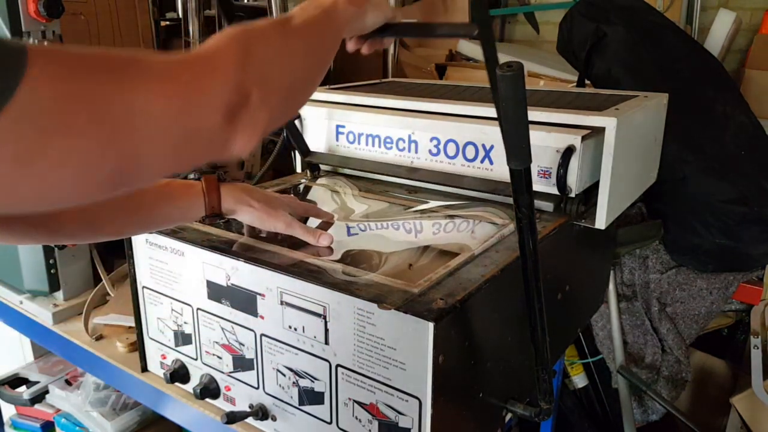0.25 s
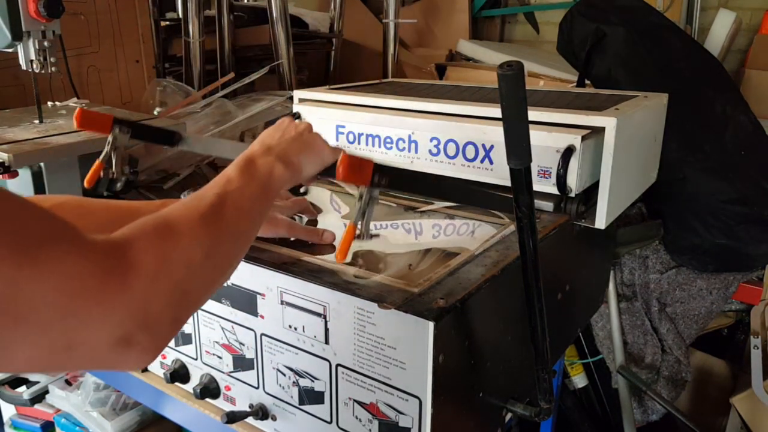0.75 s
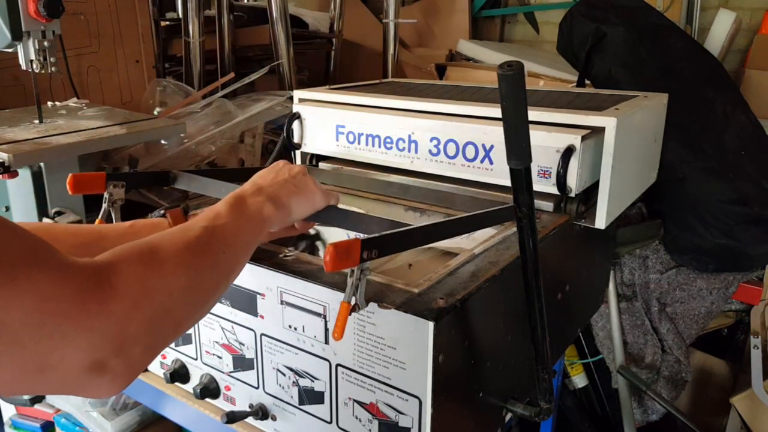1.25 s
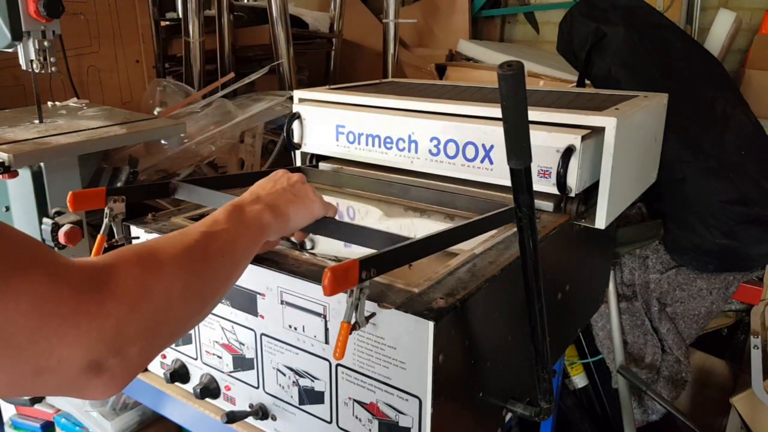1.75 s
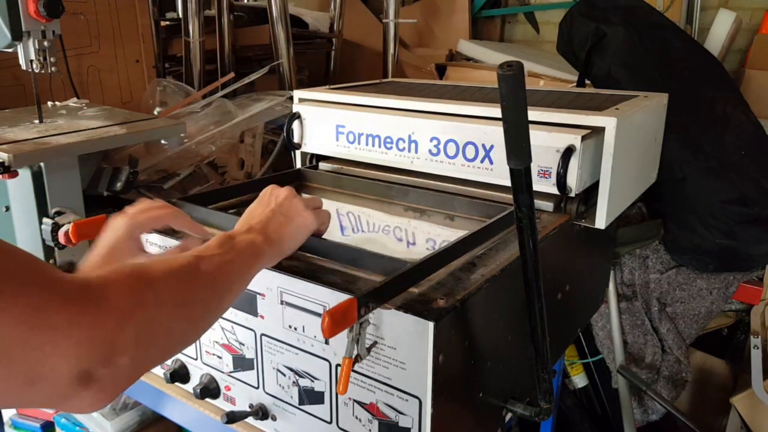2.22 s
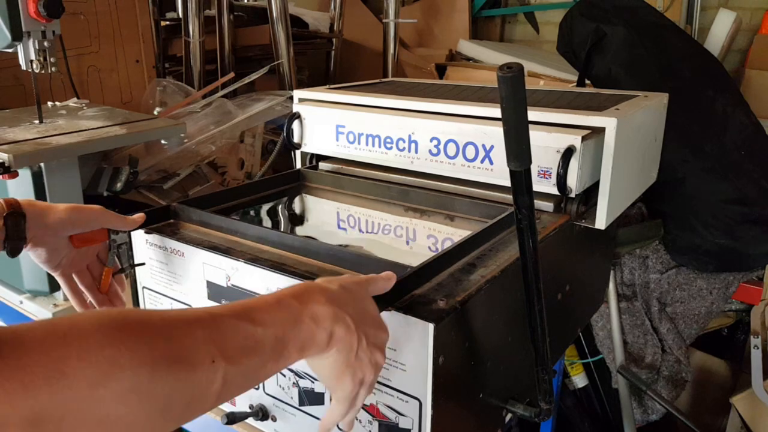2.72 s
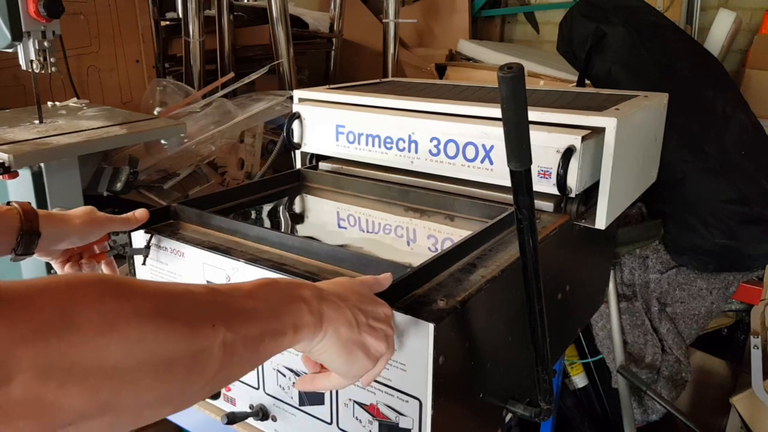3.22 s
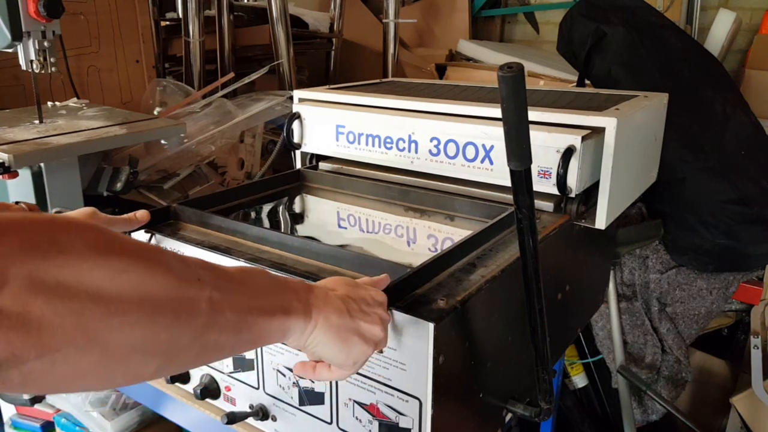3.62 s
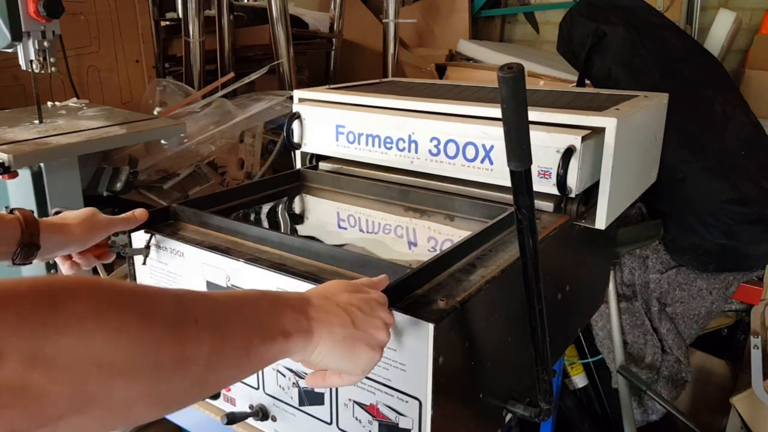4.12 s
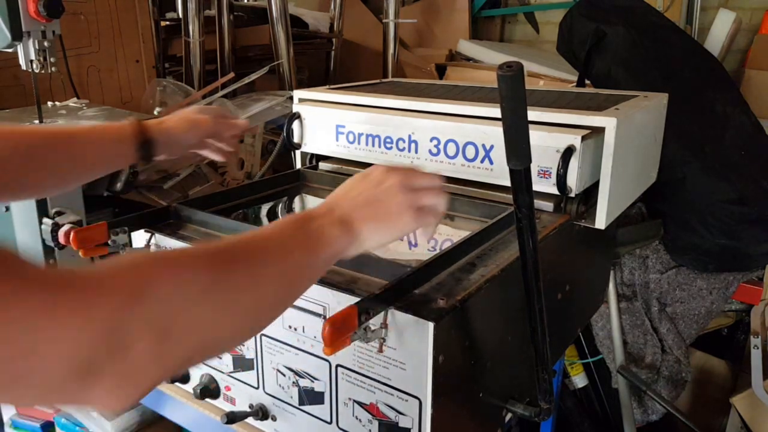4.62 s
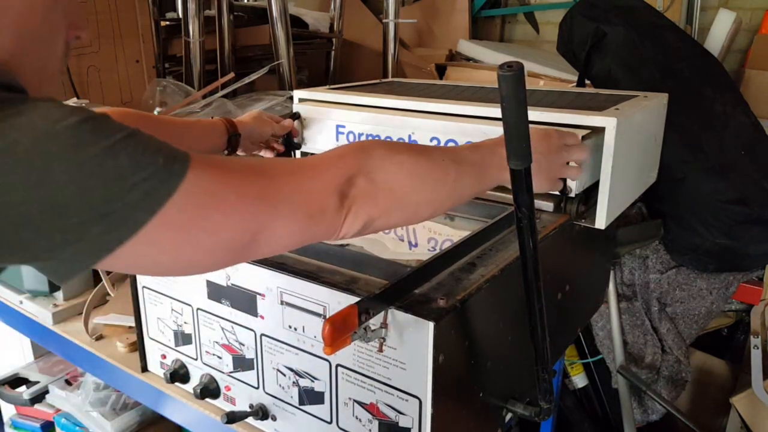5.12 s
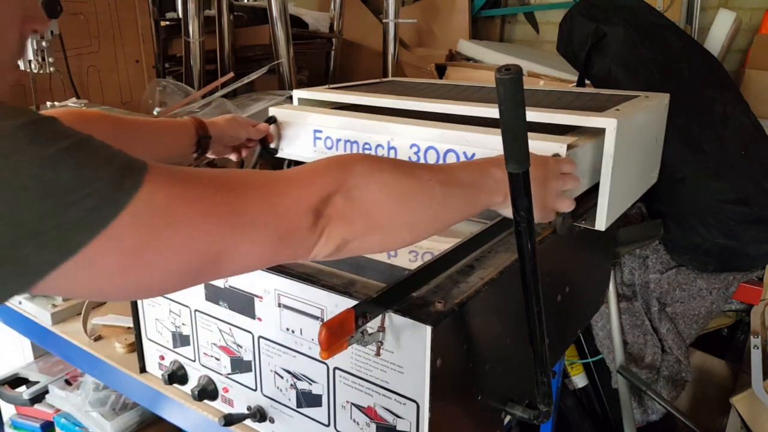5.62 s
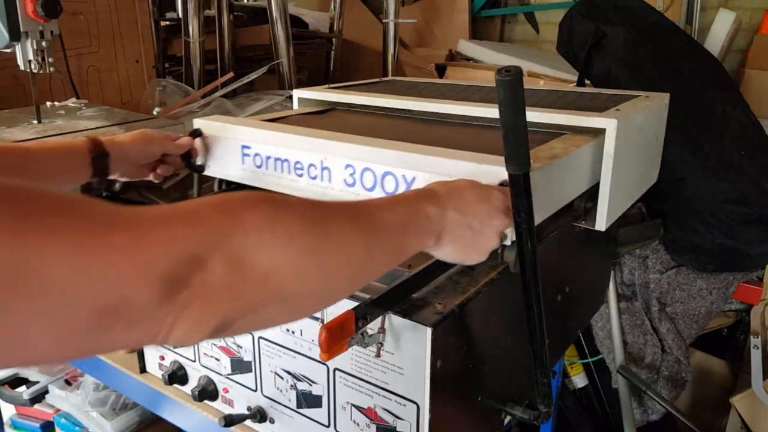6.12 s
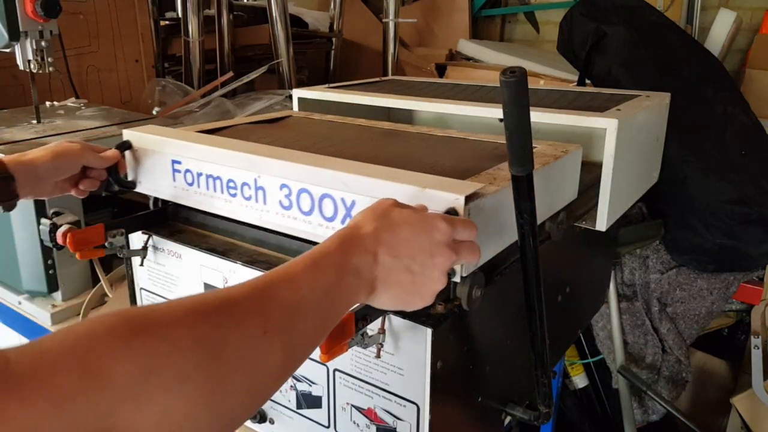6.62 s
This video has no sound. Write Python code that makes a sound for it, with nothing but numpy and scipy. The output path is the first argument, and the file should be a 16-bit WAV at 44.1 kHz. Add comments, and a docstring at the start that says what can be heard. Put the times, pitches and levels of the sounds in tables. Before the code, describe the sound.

A close stereo perspective in a small, fairly dry workshop, with a faint low hum near 80 Hz, slight rumble and thin hiss, stronger on the left. A steel frame shudders in the hands; a hollow knock comes at 0.3 s, then a hard, clattering landing on the cabinet at 0.7-0.8 s. Softer thumps, faint thin squeaks and short scrapes follow, with a firm thud at 1.5 and a bright catch clack at 1.66. Light lever clicks begin at 2.7; sharp clamp snaps ring at 3.1 and 3.3. Dull hollow thuds cluster at 3.6-3.8 as the clamps are pressed home. From 4.2 it is nearly quiet, with a soft cloth rustle. At 5.25 a sheet-metal heater jerks, scrapes at 5.47, then rolls forward with rumble, gritty rattle and hiss. Clanking bumps peak at 6.0-6.5, with brief squeaks and a scrape at 6.3, before the roll eases to the end around 6.9.

```python
"""Clamping a vacuum forming machine

A steel clamping frame is swung down in a small workshop and knocks on the hollow cabinet; toggle clamps
snap over and are pressed home, then the heater rolls forward on rails, bumping, over a low hum.
Blows are struck modal resonators: coloured decaying noise plus clear modes, tilted by hardness.
Sliding parts are the same resonators excited by random slips; squeaks are single gliding tones.
Hum is a sine with a narrow-band waver, and the background is shaped stereo noise."""
import sys
import numpy as np
from scipy import signal
from scipy.fft import rfft, irfft, next_fast_len
from scipy.io import wavfile
from scipy.ndimage import uniform_filter1d

SR = 44100
rng = np.random.default_rng(int(sys.argv[2]) if len(sys.argv) > 2 else 0)


def generate_wav(sig):
    """Save sig (samples, or channels by samples) to the path in sys.argv[1] as 16-bit PCM at SR."""
    pcm = np.round(np.clip(np.atleast_2d(sig).T, -1, 1) * 32767).astype(np.int16)
    wavfile.write(sys.argv[1], SR, pcm)


N = 302515
RING_SIZE = 49152  # samples in one resonator response


def amp(db):
    """Decibel definition: converts a level to a linear gain."""
    return 10 ** (np.asarray(db) / 20)


def rms(x):
    """Mean energy: the root mean square of a signal."""
    return np.sqrt(np.mean(x ** 2) + 1e-20)


def read(points, hz, axis=1):
    """Logarithmic frequency scale: one table column is interpolated along it."""
    table = np.array(points, float)
    return np.interp(np.log(hz + 1), np.log(table[:, 0] + 1), table[:, axis])


def band(x, lo_hz, hi_hz, order=3):
    """Band limiting: a Butterworth band-pass filter."""
    sections = signal.butter(order, [lo_hz, min(hi_hz, SR / 2 - 1)], "band", fs=SR, output="sos")
    return signal.sosfilt(sections, x)


def colour(x, points):
    """Minimum phase: the filter through (hz, gain_db) points is causal, so attacks stay sharp."""
    size = next_fast_len(x.shape[-1])
    log_gain = np.log(amp(read(points, abs(np.fft.fftfreq(size, 1 / SR)))))
    gain = np.exp(np.conj(signal.hilbert(log_gain)))[:size // 2 + 1]
    return irfft(rfft(x, size) * gain, size)[..., :x.shape[-1]]


def add(mix, s, sound):
    """Superposition: a sound is summed into the mix from time s."""
    part = mix[:, max(round(s * SR), 0):][:, :sound.shape[1]]
    part += sound[:, :part.shape[1]]


def diffuse(size, spread):
    """Diffuse field: noise at two microphones, with side minus mid in dB set against frequency."""
    mid, side = rfft(rng.standard_normal((2, size)))
    width = amp(read(spread, np.fft.rfftfreq(size, 1 / SR)))
    left_right = np.array([mid + width * side, mid - width * side])
    return irfft(left_right / np.sqrt(1 + width ** 2), size)


def rattle(chatter_s, rattle_hz=600, first=1.4, count=12):
    """Contact bounce: one firm contact, then a quick run of lighter ones."""
    contacts, order = np.zeros(RING_SIZE), np.arange(count)
    at = (order + rng.random(count)) / count * 2 * np.clip(chatter_s, 0, .1)
    impulses = rng.choice([-1, 1], count) * np.exp(-2 * order / count)
    np.add.at(contacts, (at * SR).astype(int), impulses)
    contacts = band(contacts, rattle_hz, SR / 2, order=2)  # light rebounds carry little bass
    contacts[0] += first
    return contacts / np.linalg.norm(contacts)


# decay of the workshop before each part's decay factor: frequency_hz [Hz], t60_s [s]
ROOM_DECAY = [(100, 1), (200, 0.63), (450, 0.77), (1000, 0.54), (2800, 0.41), (7000, 0.26), (15000, 0.24)]
# stereo width of the dense modes: frequency_hz [Hz], side_minus_mid_db [dB]
STEREO_WIDTH = [(40, -13), (130, -19), (220, -16), (380, -10), (700, -6.5), (1300, -4), (2500, -1.5),
                (15000, -1)]


def response(spectrum, modes, decay=1, ring_db=0, crack_db=5, crack_s=0.0048, chatter_s=0, tick=0,
             split=0.0043, twin=0.3):
    """Modal decay: a struck part gives an early crack, decaying dense modes and a few clear ones."""
    t = np.arange(RING_SIZE) / SR
    hz, age, z = signal.stft(diffuse(RING_SIZE, STEREO_WIDTH), SR, nperseg=256)
    fading = z * np.exp(-np.log(1000) * age / (decay * read(ROOM_DECAY, hz)[:, None]))
    dense = signal.istft(fading, SR, nperseg=256)[1]
    out = dense[:, :RING_SIZE] * (1 + amp(crack_db) * np.exp(-t / crack_s))
    out[:, 0] += tick
    if chatter_s > 0:
        out = signal.fftconvolve(out, rattle(chatter_s)[None], axes=1)[:, :RING_SIZE]
    for mode_hz, db, t60 in modes:
        # higher modes reach the two microphones further out of step
        offset = rng.uniform(-1.14, 1, (2, 1)) * min(mode_hz / 6000, .5)
        phase = 2 * np.pi * (mode_hz * t + rng.random() + offset)
        # each mode has a weaker twin close by, and the two beat
        pair = np.sin(phase) + twin * np.cos(phase * (1 + split * rng.uniform(-0.53, 1)))
        out += amp(db + ring_db) * np.exp(-np.log(1000) * t / (t60 * decay)) * pair
    return colour(out, spectrum)


# the four registers thump, body, clang and edge: low_hz [Hz], high_hz [Hz]
REGISTERS = [(100, 280), (280, 700), (700, 3500), (3500, 16000)]


def contact(shape_db, strength_db, hardness, pivot_hz):
    """Contact stiffness: harder contact tilts the register levels towards the treble."""
    octaves = np.log2(np.sqrt(np.prod(REGISTERS, axis=1)) / pivot_hz)
    return strength_db + np.array(shape_db) + hardness * octaves


def blow(ring, levels_db):
    """Impact spectrum: the filter steers each register of the attack towards its level."""
    attack = ring[:, :SR // 25]  # the first 40 ms
    points = []
    for (lo, hi), db in zip(REGISTERS, levels_db):
        measured_db = 20 * np.log10(rms(band(attack, lo, hi)))
        points.append((np.sqrt(lo * hi), db - measured_db))
    return colour(ring, points)


def friction(ring, curve, registers, per_s, spread_db):
    """Stick-slip excitation: uneven tiny slips keep a part ringing; each register follows its level."""
    sizes = amp(spread_db * np.minimum(rng.exponential(1, N), 4))
    slips = sizes * rng.choice([-1, 1], N) * (rng.random(N) < per_s / SR)
    sound = signal.oaconvolve(slips[None], ring, axes=1)[:, :N]
    s, *levels = np.transpose(curve)
    out = np.zeros((2, N))
    for (lo, hi), db in zip(registers, levels):
        part = band(sound, lo, hi)
        out += part / rms(part) * amp(np.interp(np.arange(N) / SR, s, db, left=-120, right=-120))
    return out


def driven(effort, law):
    """Power law: each register's level in dB is a straight line in the shared effort in dB."""
    return [(s, *(db + slope * effort_db for db, slope in law)) for s, effort_db in effort]


def strokes(rows, rise_s, fall_db_per_s):
    """Stroke envelope: each stroke rises, holds until its length is over and falls exponentially."""
    t = np.arange(0, N, 128)[:, None] / SR
    gain = 0
    for s, length_s, *db in rows:
        fall_db = fall_db_per_s * np.maximum(t - s - length_s, 0)
        gain = gain + np.clip((t - s) / rise_s, 0, 1) * amp(np.array(db) - fall_db)
    return np.hstack([t, 20 * np.log10(gain + 1e-9)])


# steady background: frequency_hz [Hz], relative_db [dB per Hz], left_minus_right_db [dB],
# side_minus_mid_db [dB]
BACKGROUND = [(20.2, -26.5, -5, -12.5), (43.5, 2.5, -7.5, -16), (58.7, 5, 5.5, -2.5), (140, -10.5, -2, -19),
              (305, -15.5, 5.5, -9), (598, -21.5, 2.5, -2.5), (1300, -28.5, 2, 3), (1690, -27.5, 10, 0.5),
              (2050, -17.5, 12.5, 2), (3300, -34.5, 9, 0), (4050, -21.5, 11, 1.5), (8600, -41.5, 4, -4),
              (10800, -26, 2.5, -19.5), (15630, -26, 0.5, -32)]


def air(level_db=-62):
    """Stationary noise: faint room rumble and a thin hiss, the hiss stronger on the left."""
    hz = np.fft.rfftfreq(N, 1 / SR)
    sides = amp(np.outer([.5, -.5], read(BACKGROUND, hz, axis=2)))
    balance = sides / np.linalg.norm(sides, axis=0)
    white = diffuse(N, [(row[0], row[-1]) for row in BACKGROUND])
    noise = irfft(rfft(white) * amp(read(BACKGROUND, hz)) * balance, N)
    return amp(level_db) * noise / rms(noise)


# loudness of the hum: start_s [s], level_db [dB]
HUM_LEVELS = [(0, -65.5), (2, -59), (4.3, -61.5), (4.75, -68), (4.9, -62.5), (6.86, -78.5)]


def hum(hum_hz=81.2):
    """Narrow-band modulation: a low sine wavers as a little noise close to its pitch is added."""
    t = np.arange(N) / SR
    drift = band(rng.standard_normal(N), hum_hz - 5, hum_hz + 5, order=2)
    tone = np.sqrt(2) * np.sin(2 * np.pi * hum_hz * t) + .2 * drift / rms(drift)
    return amp(np.interp(t, *np.transpose(HUM_LEVELS))) * tone


# how hard the hands work the frame as they lower, seat, clamp and let go: start_s [s], effort_db [dB]
HANDLING_EFFORT = [(0, -3), (.14, -14), (.3, -6.5), (.68, -2), (.87, -6), (1.08, -9), (1.6, -3.5),
                   (1.85, 1.5), (2.05, -5), (2.3, -7), (2.45, -6.5), (2.65, -4), (2.85, -3), (3.5, 1),
                   (3.92, 2.5), (4.2, -12.5), (4.48, -14), (4.7, -32.5)]
# shudder, scrape and hiss of the frame: level_at_zero_effort_db [dB], slope [dB per dB of effort]
HANDLING_LEVELS = [(-46.5, 1), (-60.5, 2), (-71, 1.6)]
# colour of the frame's response: frequency_hz [Hz], relative_db [dB per Hz]
FRAME_COLOUR = [(40, -40), (80, -25), (110, -25), (142, -7), (165, -10), (215, 0), (310, -11), (400, -7),
                (480, -8), (550, -3), (720, -13), (930, -16), (1250, -12), (1700, -19), (2700, -16),
                (4000, -26), (7000, -31), (11500, -37), (16000, -50)]
# clear modes of the frame, before ring and decay settings: pitch_hz [Hz], relative_db [dB], t60_s [s]
FRAME_TONES = [(123.1, -14, 0.8), (143.5, -17, 0.56), (187.9, -16.5, 0.29), (209.1, -18.5, 0.37),
               (232.7, -26, 0.5), (276.5, -31, 0.91), (322.3, -26.5, 1), (382.4, -17.5, 0.39),
               (454, -28, 1), (491, -32.5, 0.62), (554.6, -28.5, 0.48), (605, -31, 0.6), (839, -18, 0.63),
               (1004, -19.5, 0.19), (1175, -30.5, 0.5), (1267, -20.5, .36), (1330, -35, 0.35),
               (1960, -22.5, 0.42), (2700, -31, 0.36), (3040, -17.5, 0.5), (3438, -22.5, .3),
               (4230, -17.5, .28)]


def shudder():
    """Forced vibration: the frame shudders, scrapes and hisses in the hands that work it."""
    ring = response(FRAME_COLOUR, FRAME_TONES, decay=0.27, ring_db=-1.0)
    levels = driven(HANDLING_EFFORT, HANDLING_LEVELS)
    return friction(ring, levels, [(50, 266), (330, 1500), (4000, 9200)], per_s=690, spread_db=2.0)


# the frame knocks on the cabinet: start_s [s], relative_strength_db [dB], hardness [dB per octave],
# decay [factor on t60], panel_hz [Hz] of the panel that is hit
FRAME_KNOCKS = [(0.296, -31.5, -10, 1.3, 198.7), (0.299, -38, -4.5, 1.7, 510),
                (0.367, -46.5, -4, 0.89, 477), (0.46, -60, -8.5, 1, 520), (0.71, -29, 0, 1.45, 186),
                (0.717, -26, -1.5, 1.27, 545), (0.729, -31.5, 1, 1.07, 425),
                (0.741, -28.5, 0.33, 1.23, 1267), (0.781, -27.5, -8, 1.25, 221.6),
                (0.799, -33, 1.14, 0.94, 2610), (0.809, -34, -1, 1.3, 539), (1.021, -42.5, -5, 0.98, 205.6),
                (1.059, -49, -5, 0.9, 555), (1.183, -40, -5, 0.67, 199), (1.203, -34.5, -9, 0.79, 145),
                (1.377, -40, -7.5, 0.97, 198.2), (1.486, -29, -10.5, 0.52, 145.5),
                (1.665, -32, -3, 1.17, 288.7), (2.114, -48, -5.5, 2.1, 129), (2.373, -44, -10, 1.7, 228.3),
                (2.742, -41, -2, 0.43, 309), (2.802, -40, -15, 0.48, 308), (2.956, -52, -4, 0.67, 554),
                (3.308, -32.5, -2, 0.85, 364)]
# a knock at hardness 0: relative levels [dB] of thump, body, clang and edge
KNOCK_REGISTERS = [1.95, 1.5, -1, -7.5]
PANEL_T60_S = 0.46  # before the decay factor


def knocks(panel_db=-11, lowest_hz=181, thinning=0.19):
    """Impact on a hollow body: frame and panel modes ring; softer knocks shake the cabinet lower down."""
    out = np.zeros((2, N))
    for s, db, hardness, decay, panel_hz in FRAME_KNOCKS:
        modes = FRAME_TONES + [(panel_hz, panel_db, PANEL_T60_S)]
        ring = response(FRAME_COLOUR, modes, decay, crack_db=3.0, crack_s=0.12, chatter_s=.0055)
        knock = blow(ring, contact(KNOCK_REGISTERS, db, hardness, pivot_hz=173))
        floor_hz = lowest_hz * 2 ** (thinning * hardness)  # thinning in octaves per unit of hardness
        add(out, s, amp(-3) * band(knock, floor_hz, SR / 2))
    return out


# the clamps snap: start_s [s], part [name], strength_db [dB], hardness [dB per octave],
# decay [factor on t60], ring_db [dB] of the clear modes
CLAMP_SNAPS = [(0.709, "catch", -38.5, -3, .8, -6), (0.744, "lever", -43.5, -6, 1.2, -11.5),
               (0.801, "left", -42, -2.5, 1.2, -4.5), (0.822, "catch", -48.5, -1.5, 1.1, -3),
               (1.656, "catch", -36.5, 4.5, 1.01, 11.5), (1.908, "catch", -61, -3, 2.7, -16),
               (2.112, "lever", -65, 4.5, 1.5, 1), (2.718, "lever", -42, 2, 0.89, 14.5),
               (2.742, "lever", -42.5, -4.5, 0.83, -5.5), (2.838, "lever", -52, -4, 1.1, -9),
               (2.906, "lever", -52.5, -6, 0.39, 4), (2.928, "lever", -53, -6, 2, 0),
               (2.984, "lever", -47, 1.2, 0.68, 9), (3.024, "lever", -56.5, 1, 0.52, -2),
               (3.063, "lever", -55, 1, 0.82, -3), (3.084, "lever", -56.5, 3, 1, -15),
               (3.106, "right", -28, 1.6, 0.89, 0.5), (3.302, "left", -31, -0.4, 0.9, 5.5),
               (3.679, "left", -71.5, 5.5, 1.6, -8), (3.741, "left", -51, -1.5, 1.4, 0),
               (3.812, "left", -51.5, -2.5, 0.74, -4), (4.985, "right", -74, 7.5, 0.92, -4.5),
               (5.29, "right", -66, -5, 0.95, -8), (5.361, "right", -58.5, 2.5, 1.05, -9)]
# the frame's catch, the loose lever and the right and left clamps, by name:
# colour as frequency_hz [Hz], relative_db [dB per Hz];
# modes, before ring and decay settings, as pitch_hz [Hz], relative_db [dB], t60_s [s]
CLAMP_PARTS = { "catch": ([(50, -8), (200, -2), (700, -5), (1300, 2.5), (2500, -2.5), (4000, 7),
               (5000, 2.5), (6600, 8.5), (9000, 0), (11500, -1), (12800, -9.5), (16000, -16)],
               [(1263, -27, 0.68), (2630, -26, 0.58), (3240, -30.5, 0.31), (3977, -34.5, 0.25),
               (5400, -25.5, 0.26), (5600, -26, 0.19), (6370, -27.5, 0.15), (6990, -29, 0.15),
               (9800, -21.5, .18)]), "lever": ([(50, -19.5), (200, 13.5), (550, -13.5), (800, -7.5),
               (1250, 3.5), (2100, 3.5), (2500, -5.5), (4000, 2), (5400, -3), (6400, 5.5), (7600, -3),
               (9400, -1), (12000, -0.5), (16000, -13.5)], [(1020, -21, 0.28), (1185, -28, .35),
               (1250, -32.5, 0.3), (1837, -20.5, .35), (1970, -23, .3), (2163, -17.5, 0.62),
               (3840, -27, 0.32), (6470, -26, 0.2), (9300, -18, .1)]), "right": ([(100, -17), (220, -10),
               (290, -9.5), (560, -6), (800, -3), (1400, 1), (2000, 3.5), (2900, 7), (3700, -8), (5000, 1),
               (6300, 2), (8000, -2.5), (11500, 0.5), (16000, -11)], [(538, -18.5, 0.3),
               (1123, -18.5, 0.65), (1670, -14.5, 0.36), (1990, -24, 0.26), (2635, -11.5, 0.42),
               (2860, -30, 0.57), (5100, -25.5, .25), (5927, -25, .25), (6060, -17, 0.22),
               (6914, -21.5, .18), (9109, -20, .17), (11249, -15, 0.18)]), "left": ([(50, -18), (200, 13),
               (400, 15), (800, -11.5), (1050, 4), (1450, -2.5), (2100, 5), (2900, 7), (3700, 6),
               (4500, -2), (6200, 3), (8000, -3.5), (11500, 3), (16000, -15.5)], [(329.5, -10, 0.29),
               (417, -14, 0.36), (1047, -21.5, 0.45), (1955, -16.5, 0.3), (2140, -17.5, 0.25),
               (2732, -21, .4), (2844, -21.5, 0.57), (3661, -29, 0.39), (5922, -27, .3)])}
# a snap at hardness 0: relative levels [dB] of thump, body, clang and edge
SNAP_REGISTERS = [-19.5, -6, -1.5, -1]


def clamps(tick_db=13):
    """Impulse excitation: one sharp tick sets each steel lever or catch ringing in its own modes."""
    out = np.zeros((2, N))
    for s, part, db, hardness, decay, ring_db in CLAMP_SNAPS:
        ring = response(*CLAMP_PARTS[part], decay, ring_db=ring_db, crack_db=-14, crack_s=0.005,
                        tick=amp(tick_db))
        add(out, s, blow(ring, contact(SNAP_REGISTERS, db, hardness, pivot_hz=1630)))
    return out


# dry metal slides and sings: start_s [s], length_s [s], pitch_hz [Hz], glide [Hz per s],
# level_db [dB], tremble_hz [Hz rms]
METAL_SQUEAKS = [(.87, 0.59, 1182, 2, -63.5, 7.3), (1.36, 0.73, 1185, 2, -71, 11),
                 (2.1, 0.11, 3430, 0, -65.5, 31), (5.216, 0.16, 330.6, -3, -52.5, 10.5),
                 (5.597, 0.074, 1160, -700, -47.5, 32), (6.278, 0.059, 470, -700, -41, 10),
                 (6.493, 0.18, 593, 13, -49.5, 4.7), (6.707, 0.084, 1012, 1100, -52, 21)]


def squeaks(room_db=-9, decay=0.94):
    """Stick-slip oscillation: one mode swells and fades, gliding and trembling, drawn out by the room."""
    out = np.zeros((2, N))
    room = response([(100, 0.0048), (10000, 0)], [], decay)
    room = room / np.linalg.norm(room[0])
    for s, length_s, hz, glide, db, width_hz in METAL_SQUEAKS:
        size = int(length_s * SR)
        tremble = uniform_filter1d(rng.standard_normal(SR), 400)[:size]
        pitch = hz + glide * np.arange(size) / SR + width_hz * tremble / rms(tremble)
        tone = np.sin(2 * np.pi * np.cumsum(pitch) / SR) * np.hanning(size)
        sound = amp(room_db) * signal.fftconvolve(tone[None], room, axes=1)
        sound[:, :size] += tone
        add(out, s, amp(db) * sound / rms(sound[:, :size]))
    return out


# steel drags on steel as the frame settles and the levers are worked:
# start_s [s], length_s [s], scrape_db [dB], hiss_db [dB]
STEEL_DRAGS = [(1.18, 0.042, -59, -72), (1.49, 0.034, -59, -66), (1.62, 0.032, -51, -64),
               (1.7, 0.091, -66, -78), (2.75, 0.092, -54.5, -61.5), (2.91, 0.15, -46, -66),
               (3.16, 0.042, -67, -60), (3.57, 0.018, -57, -56.5), (3.67, 0.078, -50, -63),
               (3.74, .03, -54, -56), (3.8, 0.077, -54.5, -72), (4.14, 0.037, -61, -66.5)]


def drags():
    """Sliding friction: short strokes of steel on steel excite the frame as scrape and hiss."""
    ring = response(FRAME_COLOUR, FRAME_TONES, decay=0.27, ring_db=-1.0)
    levels = strokes(STEEL_DRAGS, rise_s=0.014, fall_db_per_s=152)
    return friction(ring, levels, [(520, 1700), (3100, 18000)], per_s=220, spread_db=2.5)


# the clamps are pressed home: start_s [s], strength_db [dB], body_above_thump_db [dB],
# panel_hz [Hz] of the panel that answers
CLAMP_PRESSES = [(3.588, -35, -3, 360.2), (3.607, -37, -1, 448.5), (3.741, -32, 0.5, 541),
                 (3.754, -25, -12.5, 388.4), (3.796, -37, -16, 217.5)]
# colour of a press: frequency_hz [Hz], relative_db [dB per Hz]
PRESS_COLOUR = [(40, -46), (110, -30), (145, -2.5), (170, -6.5), (215, 2), (270, -7), (385, -8.5),
                (470, -11.5), (540, -9.5), (720, -19.5), (1200, -24), (1800, -32), (3000, -29), (8000, -34),
                (16000, -51)]


def presses(panel_db=-13.5, clang_db=-22.5, edge_db=-29):
    """Soft impact: a clamp pressed home shifts the frame in short, hollow thuds with little treble."""
    out = np.zeros((2, N))
    for s, db, body_db, panel_hz in CLAMP_PRESSES:
        modes = FRAME_TONES + [(panel_hz, panel_db, PANEL_T60_S)]
        ring = response(PRESS_COLOUR, modes, decay=0.77, ring_db=-2, crack_db=3, crack_s=0.018)
        add(out, s, blow(ring, db + np.array([0, body_db, clang_db, edge_db])))
    return band(out, 145, SR / 2, order=4)


# a soft rustle as the arms reach for the heater: start_s [s], level_db [dB]
ARM_REACH = [(4.302, -82), (4.46, -67), (4.619, -76.5), (4.87, -62), (5.08, -67), (5.3, -71)]
# colour of the cloth: frequency_hz [Hz], relative_db [dB per Hz]
CLOTH_COLOUR = [(200, -22), (1000, -9), (3000, -10.5), (6000, 3), (8000, -5.5), (14000, -9)]


def sleeves():
    """Fibre friction: cloth rubs softly in many small slips as the arms stretch forward."""
    ring = response(CLOTH_COLOUR, [], decay=.6)
    return friction(ring, ARM_REACH, [(500, 21000)], per_s=480, spread_db=2.5)


# how hard the heater is pulled as it jerks free, gathers speed and slows: start_s [s], effort_db [dB]
PULL_EFFORT = [(5.22, -43), (5.261, -11.5), (5.43, -13.5), (5.54, -0.5), (5.7, -3.5), (6.04, 0.5),
               (6.48, 0.5), (6.64, -4.5), (6.86, -6)]
# rumble, rattle, scrape and hiss of the heater: level_at_zero_effort_db [dB], slope [dB per dB of effort]
ROLLING_LEVELS = [(-38.5, 1.53), (-41.5, 1.55), (-50.5, 3.8), (-58, 0.5)]
# colour of the hood's response: frequency_hz [Hz], relative_db [dB per Hz]
HEATER_COLOUR = [(35, -20), (70, 10), (95, 1), (112, -6.5), (140, 2), (210, 2), (310, -7), (500, -5.5),
                 (650, -0.5), (1080, -5), (1280, -11.5), (2900, -18.5), (4300, -31.5), (11500, -34.5),
                 (16000, -36)]
# clear modes of the hood, before ring and decay settings: pitch_hz [Hz], relative_db [dB], t60_s [s]
HEATER_TONES = [(85, -31, 0.51), (141.1, -12.5, 0.23), (194, -24, 0.83), (461.4, -19.5, 0.61),
                (607.5, -21, 0.42), (669, -26.5, 0.36), (854, -28.5, 0.84), (913, -18, 0.55),
                (950, -22, 0.37), (1053, -22.5, 0.45), (1391, -21, 0.27), (1750, -21, 0.33),
                (1850, -20.5, 0.37), (2270, -13.5, .22), (2710, -18, 0.25), (3049, -20, 0.22)]


def rolling(count=4):
    """Rolling excitation: the hood rumbles, rattles and scrapes; its response changes along the way out."""
    travel = np.interp(np.arange(N) / SR, [PULL_EFFORT[0][0], PULL_EFFORT[-1][0]], [0, count - 1])
    rumble_levels = driven(PULL_EFFORT, ROLLING_LEVELS[:2])
    scrape_levels = driven(PULL_EFFORT, ROLLING_LEVELS[2:3])
    out = np.zeros((2, N))
    for place in range(count):
        ring = response(HEATER_COLOUR, HEATER_TONES, decay=0.99, crack_db=11.0, crack_s=0.0052)
        rumble = friction(ring, rumble_levels, [(85, 350), (380, 1300)], per_s=600, spread_db=2.0)
        scrape = friction(ring, scrape_levels, [(1250, 4800)], per_s=2200, spread_db=4.5)
        # equal-power crossfade from one place to the next
        out += (rumble + scrape) * np.cos(np.pi / 2 * np.clip(travel - place, -1, 1))
    return out


# coarse grains on the rails: level_at_zero_effort_db [dB], slope [dB per dB of effort]
GRIT_LEVELS = [(-55, 0.86)]


def grit():
    """Stick-slip: the runners catch and slip on the rails in a dense run of coarse grains."""
    ring = response(HEATER_COLOUR, HEATER_TONES, decay=.8, ring_db=2, crack_db=6, crack_s=.005)
    levels = driven(PULL_EFFORT, GRIT_LEVELS)
    return friction(ring, levels, [(1300, 4000)], per_s=380, spread_db=2.5)


def hiss():
    """Smooth sliding: the many fine contacts of the hood's faces merge into even noise."""
    noise = band(colour(diffuse(N, STEREO_WIDTH), HEATER_COLOUR), 4300, 14500)
    s, db = np.transpose(driven(PULL_EFFORT, ROLLING_LEVELS[3:]))
    return noise / rms(noise) * amp(np.interp(np.arange(N) / SR, s, db, left=-120))


# the heater bumps along its rails: start_s [s], relative_strength_db [dB],
# spot_hz [Hz] at which the hood rings at that spot
RAIL_BUMPS = [(5.247, -55, 786), (5.307, -51.5, 1440), (5.531, -42.5, 657), (5.58, -39.5, 1350),
              (5.615, -49, 713), (5.664, -45, 1220), (5.739, -45.5, 940), (5.769, -41.5, 751),
              (5.804, -36, 922), (5.838, -47, 1420), (5.862, -58, 1760), (5.934, -32.5, 929),
              (6.014, -40, 687), (6.034, -25, 889), (6.086, -23, 996), (6.163, -31, 973),
              (6.229, -27.5, 1076), (6.301, -34, 434), (6.387, -27, 919), (6.439, -31, 828),
              (6.457, -27, 1040), (6.511, -33, 594), (6.632, -44, 740), (6.73, -49, 1012),
              (6.803, -70, 920)]
# a full bump: relative levels [dB] of thump, body, clang and edge
BUMP_REGISTERS = [-12, -5.5, -0.5, -36.5]


def bumps(full_db=-35.5, hardening=0.25, spot_db=-8, spot_t60_s=0.29):
    """Nonlinear contact: the hood jolts at rough spots, and weaker bumps are duller."""
    out = np.zeros((2, N))
    for s, db, spot_hz in RAIL_BUMPS:
        modes = HEATER_TONES + [(spot_hz, spot_db, spot_t60_s)]
        ring = response(HEATER_COLOUR, modes, decay=.55, ring_db=-1, crack_db=-2, crack_s=0.012,
                        chatter_s=.004)
        hardness = hardening * (db - full_db)  # dB per octave
        add(out, s, amp(-3.5) * blow(ring, contact(BUMP_REGISTERS, db, hardness, pivot_hz=1600)))
    return out


# the hood brushes its housing: start_s [s], length_s [s], scrape_db [dB], hiss_db [dB]
HOOD_BRUSHES = [(5.28, 0.073, -69, -60.5), (5.465, 0.044, -43.5, -46.5), (6.29, 0.047, -41, -42)]


def brushes():
    """Sliding friction: the sheet-metal hood brushes its housing in short bursts of scrape and hiss."""
    ring = response(HEATER_COLOUR, HEATER_TONES, decay=0.87, crack_db=20.0, crack_s=0.012)
    levels = strokes(HOOD_BRUSHES, rise_s=0.014, fall_db_per_s=187)
    return friction(ring, levels, [(400, 22000), (3800, 14200)], per_s=2100, spread_db=5.0)


# difference between the microphones: frequency_hz [Hz], left_minus_right_db [dB]
MICROPHONE_BALANCE = [(100, 1), (300, 1), (1000, 2.5), (2500, 1.5), (4000, 1), (6000, -5.5), (7500, 1),
                      (9000, 4), (12000, 2), (16000, 0.5)]


def scene():
    """Superposition: all sources sum, and two microphones hear them in slightly different colours."""
    frame = shudder() + knocks() + drags()
    heater = rolling() + grit() + hiss() + bumps() + brushes()
    left, right = hum() + frame + clamps() + squeaks() + presses() + sleeves() + heater
    left = colour(left, [(hz, db / 2) for hz, db in MICROPHONE_BALANCE])
    right = colour(right, [(hz, -db / 2) for hz, db in MICROPHONE_BALANCE])
    return air() + np.array([left, right])


def record(dry, edge_hz=16000):
    """Band limitation: a linear-phase low-pass rolls off the treble around its edge."""
    lowpass = signal.firwin(511, edge_hz, window=("kaiser", 9), fs=SR)
    return signal.oaconvolve(dry, lowpass[None], "same")


dry = scene()
out = record(dry)
generate_wav(out)
```